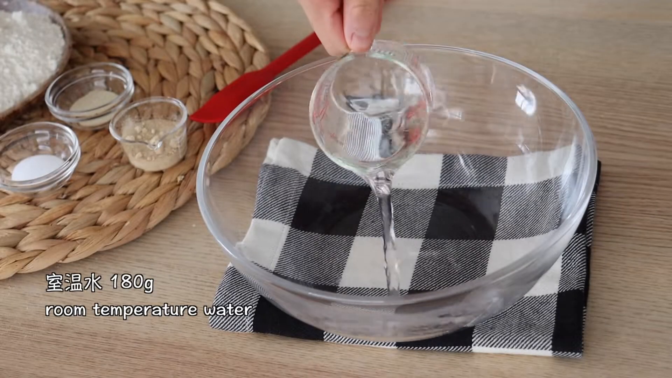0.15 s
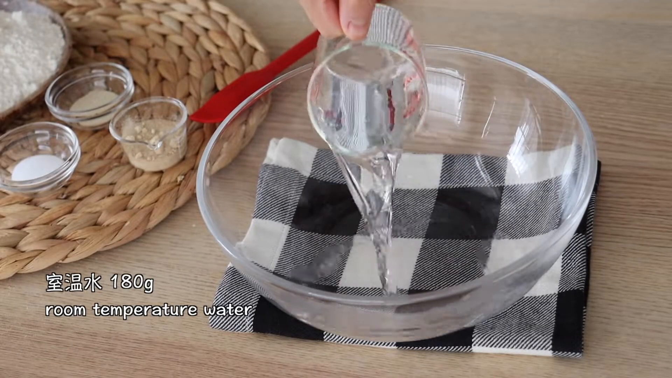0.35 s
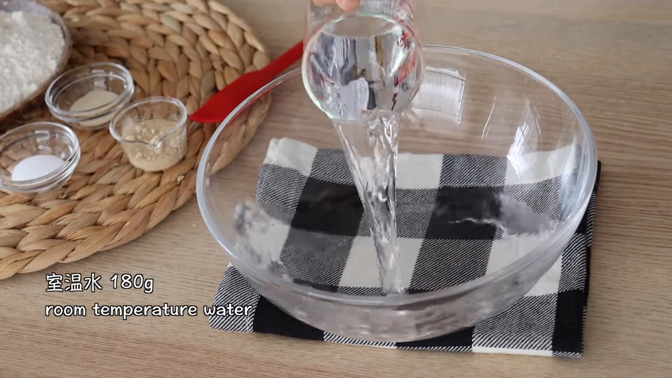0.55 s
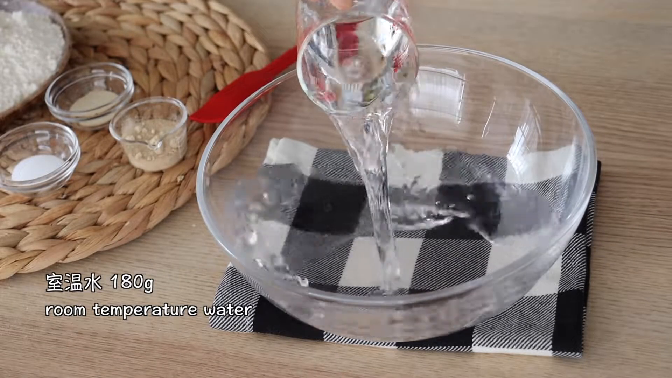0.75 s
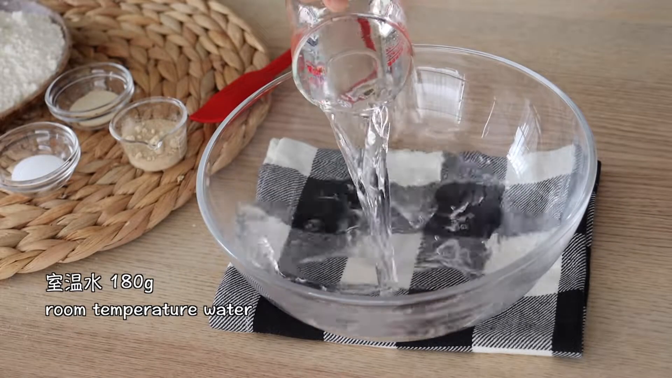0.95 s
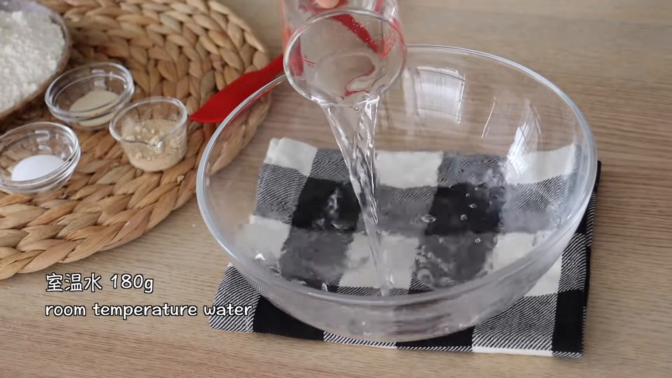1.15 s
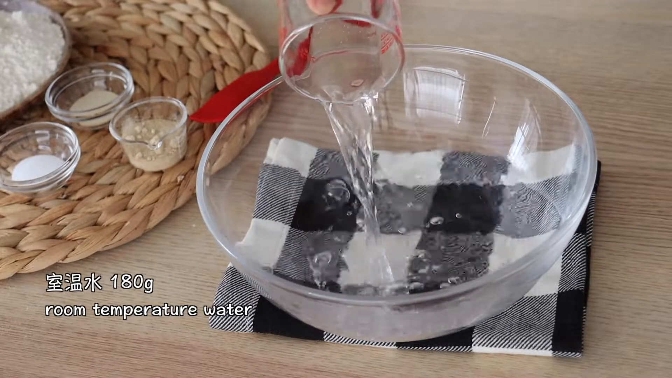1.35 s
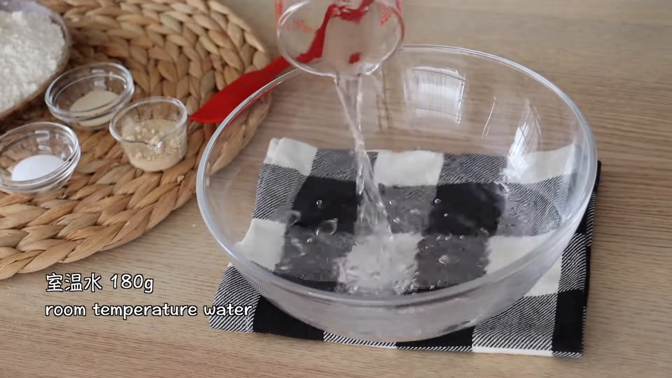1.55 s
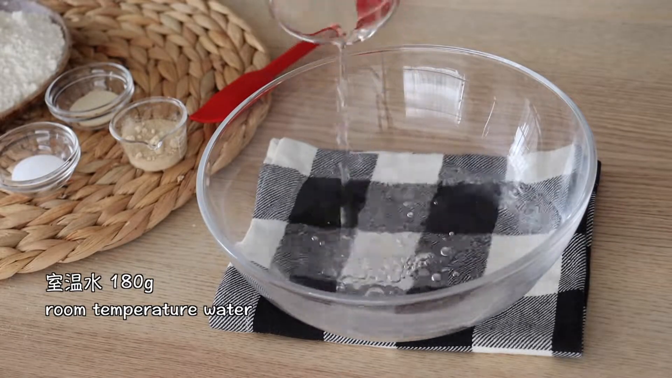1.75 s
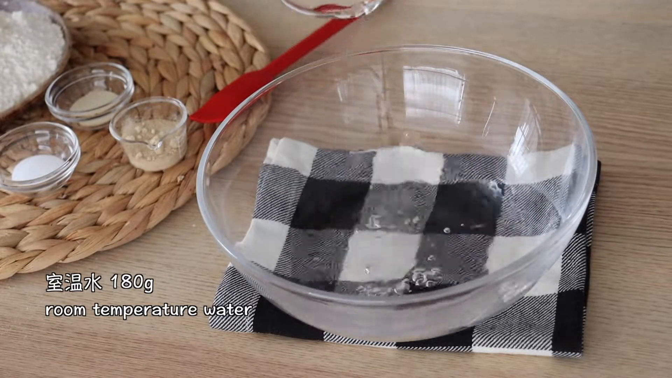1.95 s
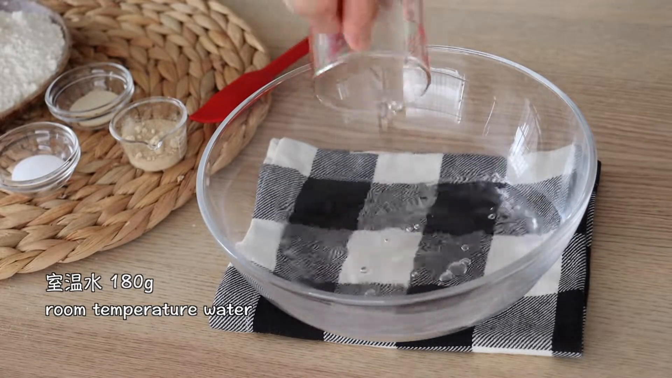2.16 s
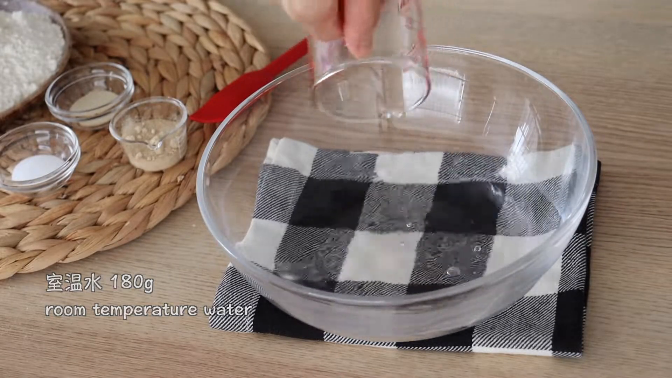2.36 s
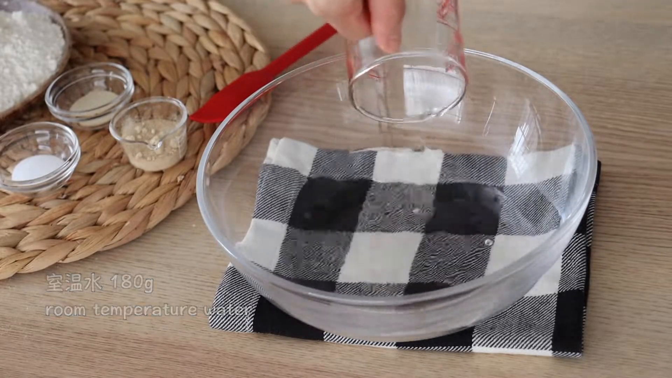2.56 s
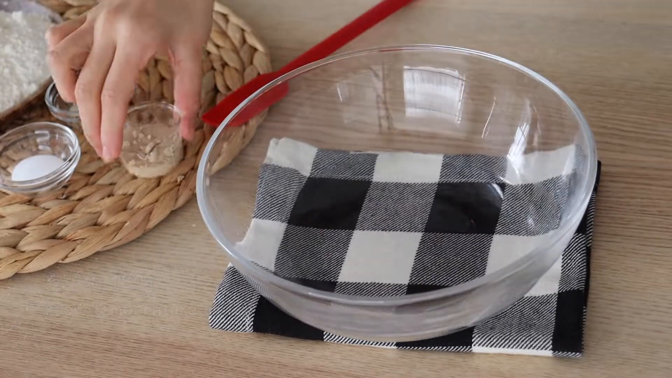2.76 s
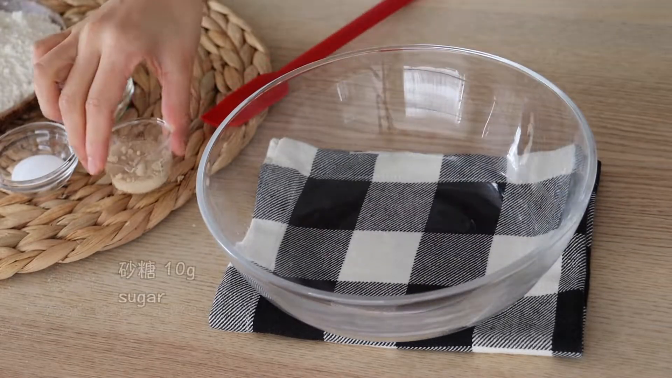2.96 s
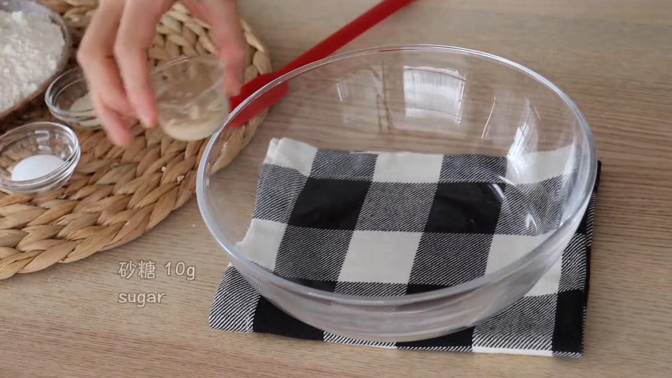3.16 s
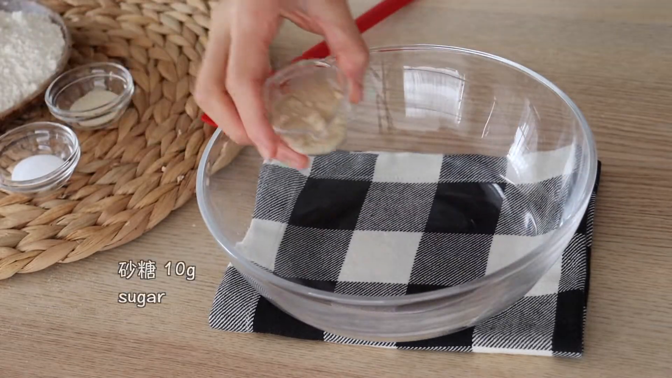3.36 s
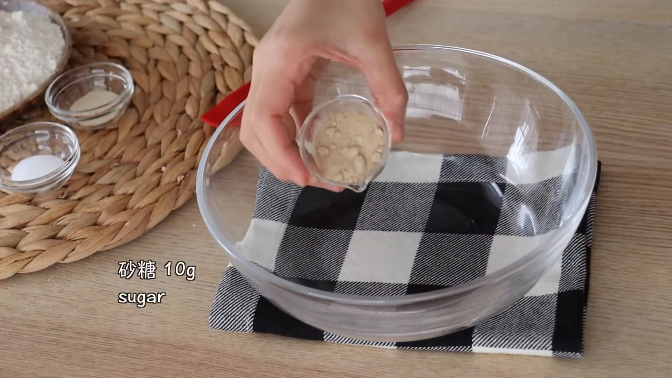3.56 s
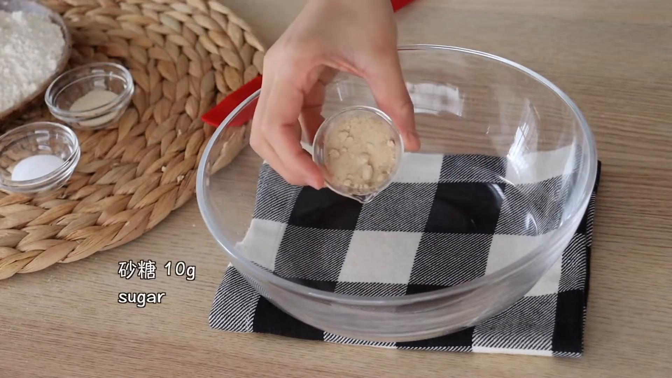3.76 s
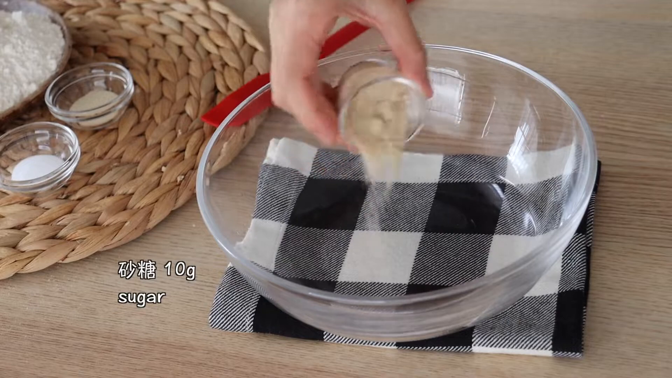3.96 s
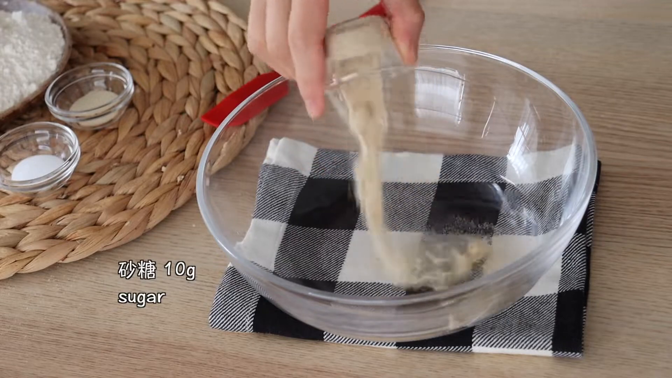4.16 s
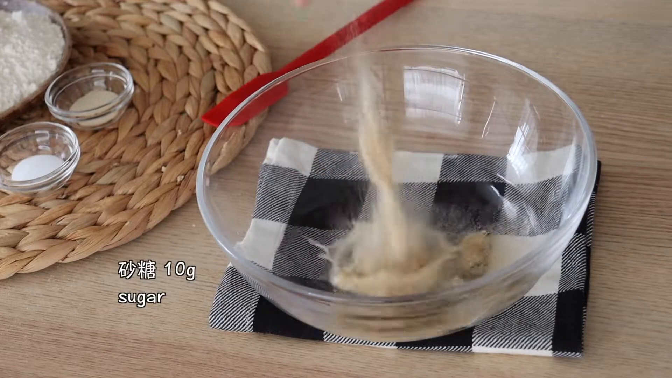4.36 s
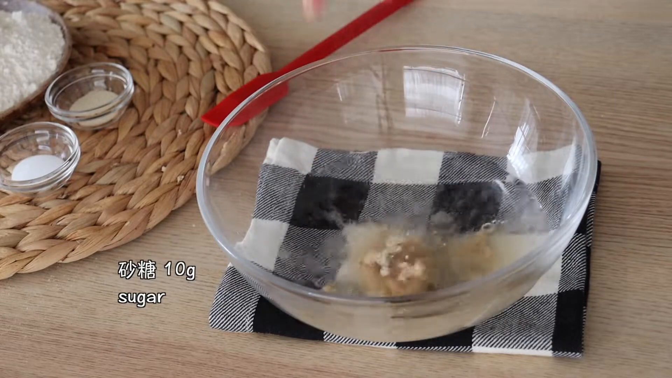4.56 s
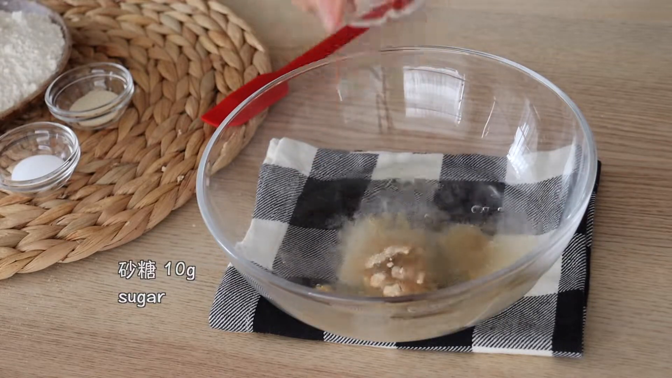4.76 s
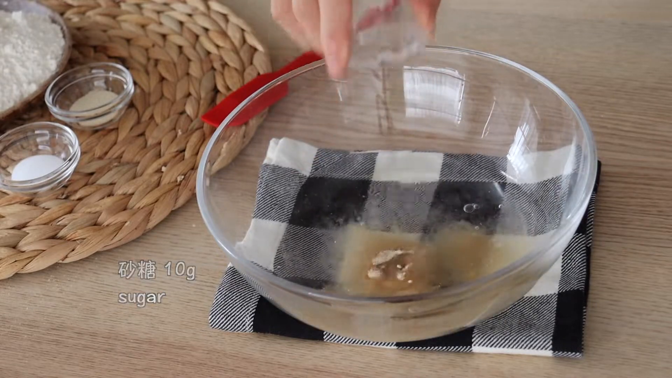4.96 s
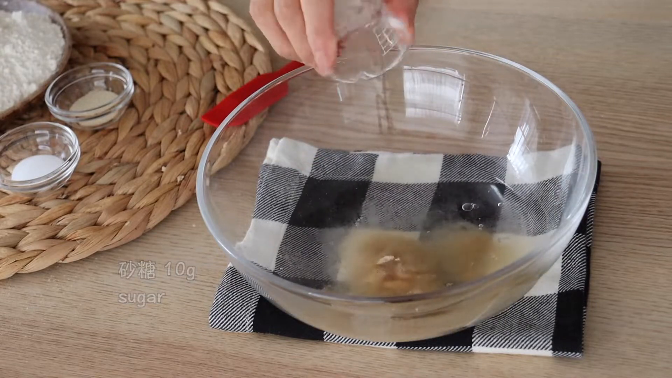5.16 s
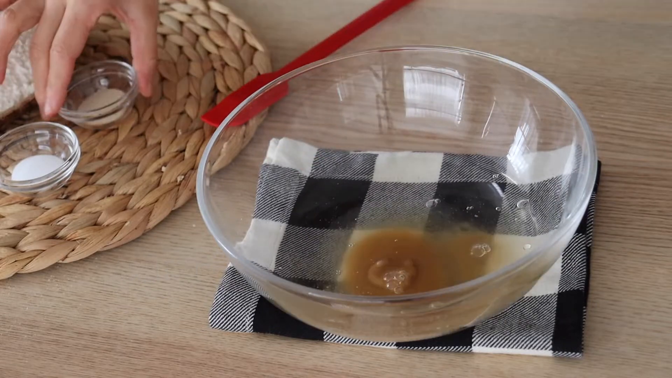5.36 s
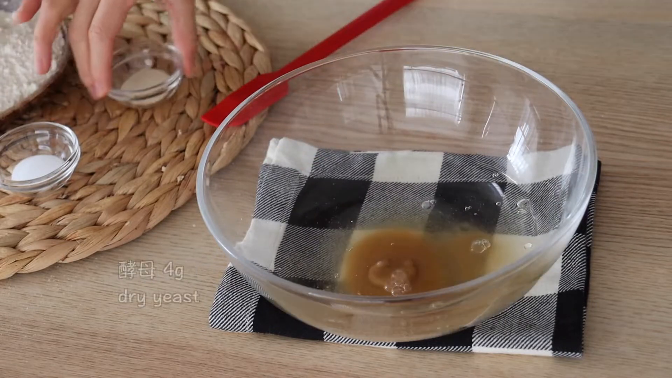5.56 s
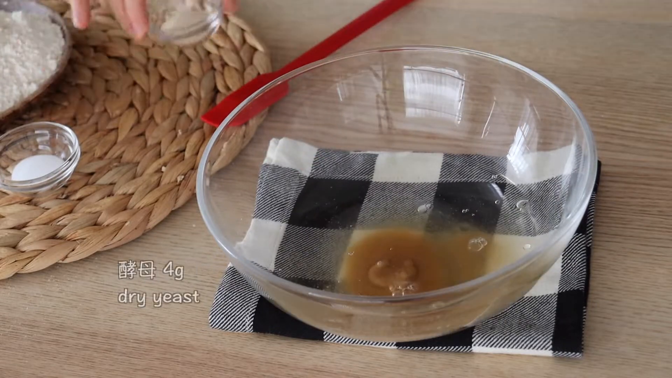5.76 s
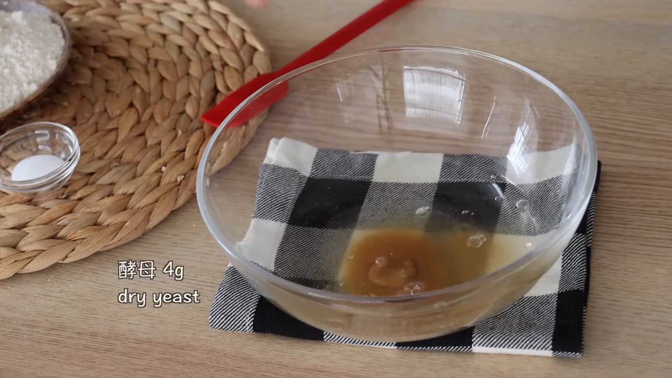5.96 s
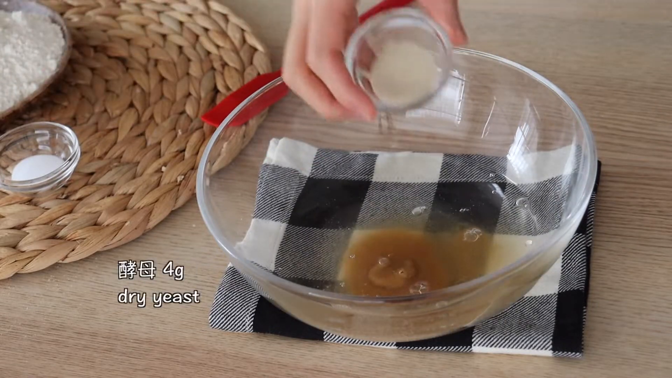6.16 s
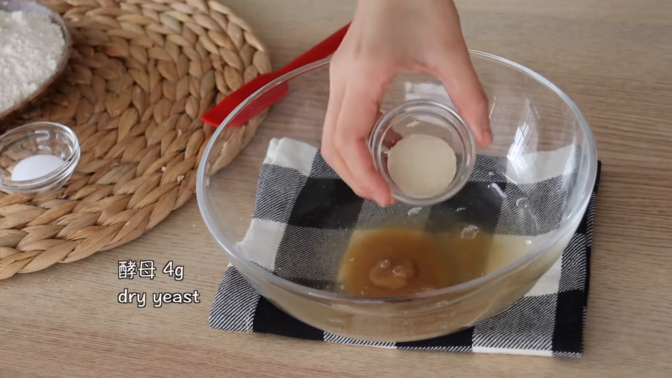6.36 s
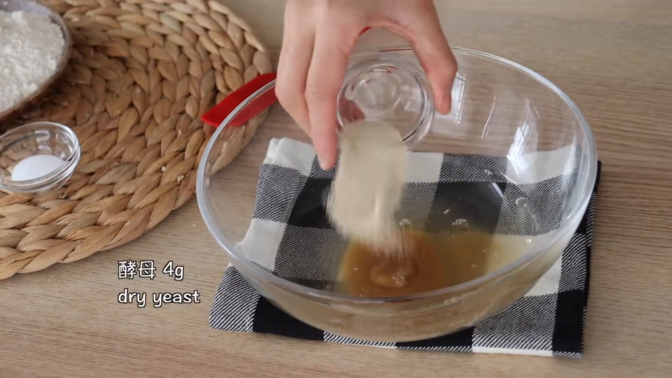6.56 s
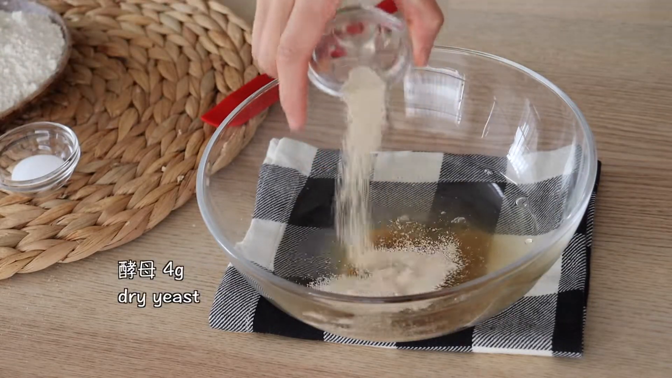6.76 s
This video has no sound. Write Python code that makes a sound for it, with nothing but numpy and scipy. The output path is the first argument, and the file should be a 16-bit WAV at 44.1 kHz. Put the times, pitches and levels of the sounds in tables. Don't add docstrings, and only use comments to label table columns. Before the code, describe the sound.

First drops, a brief gurgling pour into a glass bowl, last bright drips, then faint cup rustles on straw and small plops over low room noise.

```python
import sys
import numpy as np
from scipy import signal
from scipy.fft import rfft, irfft, next_fast_len
from scipy.io import wavfile
from scipy.ndimage import uniform_filter1d

SR = 44100
rng = np.random.default_rng(int(sys.argv[2]) if len(sys.argv) > 2 else 0)


def attenuation_scalar(level_db):
    decades = np.asarray(level_db, float) / 20
    return 10 ** decades


def wav_record(signal):
    frames = np.transpose(np.atleast_2d(signal))
    bounded = np.clip(frames, -1, 1)
    quanta = np.round(bounded * 32767).astype(np.int16)
    wavfile.write(sys.argv[1], SR, quanta)


N = 300321
TIME = np.arange(N) / SR
SIZE = next_fast_len(N + SR // 2)
BINS_HZ = np.maximum(np.arange(SIZE // 2 + 1) * SR / SIZE, 1.0)


def along(points, hz=BINS_HZ):
    point_hz, values = np.transpose(points)
    return np.interp(np.log(hz), np.log(point_hz), values)


def shaped(x, gain):
    return irfft(rfft(x, SIZE) * gain, SIZE)[..., :N]


def resonances(modes):
    response = 0
    for k, (hz, width, db) in enumerate(modes):
        detuning = (BINS_HZ / hz - hz / BINS_HZ) * hz / width
        response = response + (-1) ** k * attenuation_scalar(db) / (1 + 1j * detuning)
    return response


def unit(x):
    return x / np.sqrt(np.mean(x ** 2))


def gain_curve(rows, attack_db_s, release_db_s):
    curve = 0
    for start, hold, db in rows:
        before = np.maximum(start - TIME, 0)
        after = np.maximum(TIME - start - hold, 0)
        curve = curve + attenuation_scalar(db - attack_db_s * before - release_db_s * after)
    return curve


def walk(rate):
    k = int(SR / rate)
    held = np.repeat(rng.standard_normal(N // k + 1), k)
    return unit(uniform_filter1d(uniform_filter1d(held, k), k)[:N])


def grains(rate, scatter_db):
    happens, sign, size = rng.random((3, N))
    return unit((happens < rate / SR) * np.sign(sign - 0.5) * attenuation_scalar(scatter_db * size ** 2))


def add_ring(out, s, size, start_hz, end_hz, life_s, sag=0.59, rise_s=0.0001):
    first = int(s * SR)
    t = np.arange(min(int(3 * life_s * SR) + 8, N - first)) / SR
    age = t / life_s
    hz = start_hz * (end_hz / start_hz) ** np.minimum(age, 1.05)
    phase = 2 * np.pi * np.cumsum(np.minimum(hz, 0.45 * SR)) / SR
    envelope = (1 - np.exp(-t / rise_s)) * np.exp(-sag * age - 0.54 * age ** 4)
    out[first:first + len(t)] += size * envelope * np.sin(phase)


# (time [s], peak level [dB], frequency [Hz], life [ms])
FIRST_DROPS = [(.755, -48, 9300, 3.6), (.78, -46, 10050, 5.2), (.893, -33, 3600, 4), (.935, -40, 10060, 4),
               (0.397, -31.5, 5370, 1.8), (.415, -40, 8150, 2.3), (.416, -47, 7000, 4),
               (0.452, -39, 4630, 2.8), (.452, -48, 9160, 5), (.508, -23.5, 4480, 1.7),
               (.607, -24, 2860, 0.47), (0.611, -27, 2330, 3.7), (.613, -46, 7200, 4.4),
               (.614, -39.5, 7930, 8.5), (.63, -42.5, 9500, 4), (.657, -40.5, 7280, 6.5),
               (0.657, -38, 8300, 2.7), (.706, -30, 2440, 1.8), (.709, -38.5, 4780, 2.8),
               (0.784, -42, 1086, 17), (0.825, -16, 4340, 2.6), (.838, -40, 10050, 3.8),
               (.885, -23, 4500, 0.84), (0.912, -21.5, 3800, 1.2), (0.913, -25.5, 3010, 5.4),
               (.917, -26, 3470, 2.3), (.923, -28.5, 2990, 6), (.93, -30, 2020, 5), (0.939, -33, 3120, 6),
               (.95, -42, 1030, 14)]
# (time [s], peak level [dB], frequency
# [Hz], life [ms])
STREAM_BUBBLES = [(1.003, -26.5, 2480, 6.3), (1.058, -29.5, 4400, 2.7), (1.06, -23, 2400, 2.8),
                  (1.076, -26, 2710, 3.6), (1.127, -30, 3564, 11), (1.146, -28.5, 4040, 3.6),
                  (1.24, -29, 4570, 1.7), (1.277, -19.5, 2340, 3.3), (1.318, -30, 1740, 4),
                  (1.348, -22.5, 2620, 1.5), (1.362, -18, 4200, 1.6), (1.364, -26, 1480, 7.1),
                  (1.404, -27.5, 4200, 8.4), (1.444, -25.5, 1390, 5.6), (1.509, -18, 1500, 5),
                  (1.523, -19.5, 1328, 14), (1.525, -17, 1800, 5), (1.541, -11, 1630, 2.7),
                  (1.572, -14, 1370, 7.4), (1.59, -15.5, 4140, 1.4), (1.594, -14.5, 1070, 1.7),
                  (1.615, -26, 2210, 4.6), (1.615, -14, 1123, 2.8), (1.645, -25, 2240, 1.6),
                  (1.676, -19, 2330, 3.4), (1.642, -21, 4400, 2), (1.651, -17.5, 4500, 1.1),
                  (1.689, -29, 2510, 9.4), (1.711, -19, 4570, 0.78)]
# (time [s], peak level [dB], frequency [Hz], life [ms])
CROWD_BUBBLES = [(1.019, -29, 4500, 1.8), (1.036, -41, 1600, 9.3), (1.069, -32, 2300, 3),
                 (1.086, -30, 2500, 4.6), (1.096, -34, 2670, 5.6), (1.124, -25, 5320, 2),
                 (1.146, -37, 1800, 3), (1.24, -35.5, 1640, 11), (1.254, -35, 5000, 2),
                 (1.264, -33, 4740, 2), (1.297, -32, 5000, 1.5), (1.303, -32, 2170, 6.7),
                 (1.304, -30, 4270, 2.5), (1.317, -29, 2290, 3.6), (1.335, -30.5, 3600, 2.7),
                 (1.339, -33, 1500, 7.1), (1.351, -30, 3740, 3), (1.399, -30, 1560, 3.6),
                 (1.42, -30, 1380, 7), (1.431, -35, 4200, 2.6), (1.459, -33, 4200, 2),
                 (1.463, -32, 1350, 6), (1.479, -28, 2010, 4.2), (1.483, -38, 4200, 4.3),
                 (1.496, -28, 2450, 4.4), (1.516, -18, 1600, 6), (1.517, -32, 900, 2.4),
                 (1.523, -27.5, 2800, 4), (1.537, -28, 4200, 4), (1.564, -21.5, 4730, 1.3),
                 (1.571, -20, 2780, 1.8), (1.58, -26, 4200, 2), (1.599, -17.5, 1240, 3.7),
                 (1.603, -26, 2460, 4.6), (1.611, -21, 2720, 2.3), (1.62, -13, 1190, 4.4),
                 (1.627, -22, 4630, 1.4), (1.629, -19.5, 1100, 3.8), (1.65, -29, 1090, 7.2),
                 (1.668, -28, 4400, 2), (1.665, -28, 1140, 3.5), (1.691, -27, 4270, 4.4),
                 (1.763, -37, 4500, 5.1), (1.916, -30, 1600, 4.9), (1.945, -38, 1600, 4),
                 (1.903, -30, 1595, 6), (1.902, -33, 2400, 5)]
# (time [s], peak level [dB], frequency [Hz], life [ms])
SPECKS = [(0.7723, -43, 10000, 1.2), (0.8236, -41, 12000, 1.2), (0.8378, -39, 10100, 1.2),
          (0.898, -43, 11600, 1.2), (0.9344, -43, 11700, 1.2), (0.9563, -37, 13100, 1.2),
          (0.9948, -46, 11800, 1.2), (1.1255, -50, 10000, 1.2), (1.1255, -42, 11300, 1.2),
          (1.1684, -45, 11500, 1.2), (1.1803, -43, 11800, 1.2), (1.2023, -40, 11500, 1.2),
          (1.2761, -43, 11500, 1.2), (1.2951, -41, 11500, 1.2), (1.3614, -36, 11800, 1.2),
          (1.4811, -33, 15400, 1.2), (1.5206, -38, 12400, 1.2), (1.5689, -45, 10000, 1.2),
          (1.5689, -31, 11400, 1.2), (1.5914, -35, 12000, 1.2), (1.6278, -32, 11700, 0.94),
          (1.6426, -18, 11400, 1.2), (1.6862, -32, 10100, 1.2), (1.75, -31, 11800, 1.1)]
# (time [s], peak level [dB], frequency [Hz], life [ms])
LAST_DRIPS = [(1.751, -26, 4900, 2.2), (1.772, -24.5, 1500, 9.6), (1.773, -21.5, 2140, 4.8),
              (1.777, -20.5, 2440, 7.7), (1.861, -17.5, 4800, 1.3), (1.8613, -10.5, 1570, 5.2),
              (1.8612, -5, 2180, 0.79), (1.773, -20, 4200, 2.5), (1.774, -25, 3220, 1.5),
              (1.875, -23, 1600, 8.6), (1.889, -24, 2465, 6.9), (1.951, -33, 2460, 5.4),
              (1.95, -32.5, 3940, 8.7), (1.951, -19, 6400, 1.1), (1.953, -41, 7000, 24),
              (2.02, -46.5, 2470, 8.5)]
# (time [s], peak level [dB], frequency [Hz], life [ms])
PLOPS = [(3.714, -44, 3200, 3.7), (3.867, -48, 3320, 6.9), (4.101, -39, 2100, 1.3),
         (4.204, -22.5, 1500, 0.91), (4.209, -38, 1370, 4.9), (4.205, -32, 3780, 0.47),
         (4.301, -32.5, 2500, 8.3), (4.301, -30, 4130, 3.1), (4.301, -45, 6800, 3.2),
         (4.369, -32.5, 150, 9.5), (4.37, -40, 2530, 1.9), (4.379, -37, 2460, 6.1), (4.388, -47, 4130, 7.2),
         (4.471, -25.5, 2350, 3.2), (4.477, -27.5, 4000, 2.6), (6.322, -45, 4180, 4), (6.66, -47, 5320, 10),
         (6.74, -47, 2400, 14)]
# (time [s], peak level [dB], start frequency [Hz], life [ms], climb [octaves])
RISERS = [(.71, -22, 1936, 7.1, 0.25), (0.718, -37, 2250, 5, 0.81), (0.843, -17, 1222, 19.7, 0.27),
          (.868, -16, 1636, 6.9, 0.39), (0.997, -32, 4110, 6.6, 0.13), (1.086, -34, 4250, 4.7, 0),
          (1.081, -28.5, 1035, 25.4, 0.81), (1.155, -31, 955, 19, 0.82), (1.181, -31.5, 4600, 3.4, 0.26),
          (1.196, -36, 2400, 4.5, 0.13), (1.542, -19.5, 1555, 8.1, 0.59), (1.632, -22, 1720, 7.5, 0.54),
          (1.715, -26.5, 2214, 13.4, 0.26), (4.369, -38, 1020, 4, 0.54), (4.474, -29, 2820, 6.4, 0.22),
          (6.312, -51, 2950, 12, .47), (6.644, -46, 4330, 8.6, 0.18)]


def bubbles():
    swell = 0.48
    pinch_db = -8.5
    steady = [*FIRST_DROPS, *STREAM_BUBBLES, *CROWD_BUBBLES, *SPECKS, *LAST_DRIPS, *PLOPS]
    out, clicks = np.zeros((2, N))
    for s, db, hz, life_ms, climb in [(*row, 0) for row in steady] + list(RISERS):
        birth_s, life_s = s - 0.0005, life_ms / 1000
        rise_s = 0.000067 + 0.00006 * life_ms + swell * climb ** 3 * life_s
        add_ring(out, birth_s, attenuation_scalar(db + 5.0), hz, hz * 2 ** climb, life_s, rise_s=rise_s)
        clicks[int(birth_s * SR)] += attenuation_scalar(0.64 * db + pinch_db)
    return out + shaped(clicks, resonances([(9000, 5400, 0.5)]))


# (time [s], peak level [dB], ring frequency [Hz], body against snap [dB])
TICKS = [(0.7717, -39, 10500, -11), (0.8254, -35, 5430, -11.5), (0.844, -42, 9600, 2),
         (0.936, -39, 11700, -14), (0.9934, -35, 7200, -12), (1.098, -37, 8800, -12),
         (1.124, -34, 5500, -14), (1.1367, -41, 5600, -14), (1.181, -41, 12000, -9),
         (1.203, -44, 11500, -14), (1.3, -34, 9600, -19), (1.3618, -36, 12500, -7), (1.321, -38, 6600, -14),
         (1.397, -35.5, 7550, -5), (1.5096, -38, 9000, -17), (1.5596, -33, 9600, -14),
         (1.592, -32.5, 6800, 0), (1.615, -32.5, 6400, 2.5), (1.6436, -26, 9700, -11),
         (1.6858, -28.5, 9900, -12), (1.749, -26.5, 9100, -16), (1.7731, -29.5, 8440, 6),
         (1.8115, -31, 6750, -9), (1.8606, -30, 6850, 5), (1.884, -27, 11700, -23), (1.95, -30, 6230, -23),
         (4.2033, -49, 5000, 6), (4.485, -42.5, 9300, -14), (4.2997, -42, 9360, -6),
         (4.3682, -47, 11300, -2)]
# (frequency [Hz], width [Hz], level [dB])
BOWL_MODES = [(1500, 610, 7.5), (2400, 510, 20.5), (4400, 1100, 23), (7000, 3400, 1.5), (9570, 3300, 3),
              (11700, 2800, 1.5), (14800, 680, -0.5)]


def ticks():
    top, body, ring = np.zeros((3, N))
    fade = np.exp(-np.arange(40) / SR / 0.0004)
    for s, db, hz, body_db in TICKS:
        snap = attenuation_scalar(1.263 * db + 24) * rng.standard_normal(40) * fade
        first = int(s * SR)
        top[first:first + 40] += snap
        body[first:first + 40] += attenuation_scalar(body_db) * snap
        add_ring(ring, s, attenuation_scalar(db + 5.5), hz, hz, 0.0018, rise_s=0.00016)
    return shaped(top, resonances(BOWL_MODES[3:]) ** 2) + shaped(body, resonances(BOWL_MODES[:2])) + ring


# (time [s], level [dB])
FLOW = [
    (.8, -48),
    (.88, -20.5),
    (1.13, -13.5),
    (1.22, -16.5),
    (1.28, -11.5),
    (1.57, -5),
    (1.7, -6),
    (1.8, -26),
    (2.02, -25.5),
]


def swarm(sizes, count, cycles, scatter_db, climb):
    out, start, end = np.zeros(N), FLOW[0][0], FLOW[-1][0]
    for when, pick, detune, loud, life in rng.random((count, 5)):
        hz, spread, db = sizes[int(pick * len(sizes))]
        hz = hz + spread * (2 * detune - 1)
        s, size = start + when * (end - start), attenuation_scalar(db + scatter_db * loud ** 2)
        add_ring(out, s, size, hz, hz * (1 + climb * life), cycles * (0.24 + life) / hz, rise_s=0.00013)
    return out / np.std(out[int(start * SR):int(end * SR)])


# (frequency [Hz], spread [Hz], level [dB])
GURGLE = [(1500, 300, 0.5), (2010, 380, -6), (2400, 380, 2)]
# (frequency [Hz], spread [Hz], level [dB])
CHIRP = [(3310, 530, -3.5), (4250, 420, -7), (5430, 950, -7.5)]
# (frequency [Hz], spread [Hz], level [dB])
FIZZ = [(7000, 950, 5.5), (9000, 830, 4), (12500, 1800, -16)]


def churn():
    flow_db = np.interp(TIME, *np.transpose(FLOW), left=-400, right=-400)
    gurgle = swarm(GURGLE, count=1200, cycles=9.6, scatter_db=8.0, climb=0.16)
    chirp = swarm(CHIRP, count=900, cycles=12.5, scatter_db=19.0, climb=0.12)
    fizz = swarm(FIZZ, count=350, cycles=11.0, scatter_db=4.0, climb=0.048)
    spray = unit(shaped(grains(3000.0, 6.9), resonances([(5500, 4300, 2), (12500, 13000, 1)])))
    splash = unit(shaped(grains(900.0, 11.0), resonances(BOWL_MODES)))
    out = gurgle * attenuation_scalar(-25 + 1.28 * flow_db)
    out += chirp * attenuation_scalar(-36 + 0.66 * flow_db)
    out += (attenuation_scalar(-47) * fizz + attenuation_scalar(-48) * spray) * attenuation_scalar(0.57 * flow_db)
    return out + splash * attenuation_scalar(-43 + 0.87 * flow_db)


# (start [s], hold [s], level [dB])
SCRAPES = [(2.775, 0.11, -49.5), (2.818, 0.0063, -44.5), (2.89, 0.027, -57), (2.9, 0.011, -45.5),
           (3.712, .008, -58), (3.865, 0.0098, -60), (4.37, 0.029, -51.5), (5.36, 0.092, -53),
           (5.452, 0.013, -49.5), (5.47, 0.064, -46), (5.522, 0.018, -42), (5.55, 0.035, -36.5),
           (5.605, 0.037, -43), (5.62, 0.0073, -40)]
# (frequency [Hz], width [Hz], level [dB])
STRAW_MODES = [(890, 870, -11), (1600, 2900, 9.5), (2330, 500, -5), (3020, 2500, 8), (4200, 570, 1),
               (5000, 2200, 4.5), (7000, 9800, -1.5), (9080, 1300, 2.5), (12000, 14000, 4)]
# (start [s], hold [s], level [dB])
PATTER = [
    (6.643, 0.0056, -41),
    (6.66, .04, -67),
]
# (start [s], hold [s], level [dB])
BRUSHES = [
    (2.9, 0.014, -46.5),
    (5.385, 0.043, -45.5),
    (5.55, 0.023, -62),
]


def scrapes():
    crackle = 0
    for hz, width, db in STRAW_MODES:
        fibre = unit(shaped(grains(2500.0, 4.6), resonances([(hz, width, 0)]) ** 2))
        crackle = crackle + attenuation_scalar(db + 2.6 * walk(70.0)) * fibre
    patter = unit(shaped(grains(5000.0, 9.4), resonances([(4500, 2400, -1.3), (9900, 3100, -1.2)])))
    patter_gain = gain_curve(PATTER, 3000.0, 360.0) + gain_curve(BRUSHES, 600.0, 500.0)
    return attenuation_scalar(4.5) * unit(crackle) * gain_curve(SCRAPES, 1360.0, 990.0) + patter * patter_gain


# (frequency [Hz], width [Hz], level [dB])
BOARD_MODES = [(143, 17, -8), (221, 27, 4.5), (338, 20, 7), (408, 102, 0), (576, 104, 1), (666, 800, -12)]
# (frequency [Hz], width [Hz], level [dB])
LEG_MODES = [(21.4, 9.4, -2.5), (54.4, 15, -10), (68.4, 7.7, -0.5)]
# (frequency [Hz], width [Hz], level [dB])
RAIL_MODES = [(98, 16, -1), (142.9, 9.9, 0)]
# (start [s], hold [s],
# level [dB])
KNOCKS = [
    (1.51, .13, -57),
    (2.772, .003, -63.5),
    (2.783, 0.16, -59.5),
    (4.29, .004, -53),
    (4.369, 0.0045, -59),
    (4.69, 0.0085, -54),
    (5.51, 0.14, -50),
    (5.545, 0.07, -42),
]
# (start [s], hold [s], level [dB])
TOUCHES = [
    (3.708, 0.011, -50),
    (3.858, 0.046, -50.5),
    (3.93, 0.08, -64),
]
# (start [s], hold [s], level [dB])
LEG_PUSHES = [
    (1.6, 0.19, -50),
    (2.8, 0.17, -47.5),
    (3.3, 0.87, -59),
    (4.34, 0.053, -43),
    (4.55, 0.082, -42),
    (5.1, .02, -57),
    (5.4, 0.19, -58),
    (5.76, 0.14, -44.5),
]
# (start [s], hold [s], level [dB])
RAIL_PUSHES = [
    (1.5, 0.27, -51),
    (2.79, 0.057, -56),
    (4.31, .03, -48.5),
    (4.37, 0.034, -42),
    (4.95, 0.08, -49.5),
    (5.62, 0.03, -45),
    (5.9, .7, -62),
]


def table():
    jolts = grains(1500.0, 10.0)
    board = unit(shaped(jolts, resonances(BOARD_MODES)))
    touch = unit(shaped(jolts, resonances(BOARD_MODES[2:])))
    legs = unit(shaped(rng.standard_normal(N), resonances(LEG_MODES) ** 2))
    rails = unit(shaped(rng.standard_normal(N), resonances(RAIL_MODES) ** 2))
    out = attenuation_scalar(10.0) * board * gain_curve(KNOCKS, 540.0, 356.0)
    out += attenuation_scalar(10.0) * touch * gain_curve(TOUCHES, 1100.0, 360.0)
    out += attenuation_scalar(3.5) * legs * gain_curve(LEG_PUSHES, 200.0, 35.0)
    return out + attenuation_scalar(5.0) * rails * gain_curve(RAIL_PUSHES, 270.0, 117.0)


# (time [s], peak level [dB], frequency [Hz], life [ms])
SWAYS = [(4.325, -30, 68, 30), (4.368, -27.5, 72, 64), (4.44, -37, 66, 30), (4.54, -33, 68, 79),
         (4.62, -33, 68, 50), (5.8, -34, 68, 65), (3.862, -38, 400, 10), (3.884, -37, 330, 11),
         (3.904, -35, 420, 11), (5.531, -20, 358, 5.8), (5.567, -24.5, 454, 8), (5.603, -22, 242, 9.7),
         (5.624, -23, 300, 5.1), (5.634, -27, 180, 12), (5.655, -25, 260, 6)]


def sways():
    out = np.zeros(N)
    for s, db, hz, life_ms in SWAYS:
        add_ring(out, s, attenuation_scalar(db), hz, hz, life_ms / 1000, rise_s=0.14 / hz)
    return out


# (frequency [Hz], T60 [s])
ROOM_T60 = [(300, 0.19), (2000, 0.23), (6000, 0.18), (14000, 0.17)]
# (frequency [Hz], level [dB])
ROOM_COLOUR = [(1500, -5), (2500, -1.5), (4200, -3), (8000, 1), (13000, -4)]


def room():
    t = np.arange(SR // 2) / SR
    tails, centres = 0, 350 * 2.0 ** np.arange(6)
    for hz, t60 in zip(centres, along(ROOM_T60, centres)):
        band = signal.butter(2, [hz / np.sqrt(2), hz * np.sqrt(2)], "band", fs=SR, output="sos")
        strength = attenuation_scalar(3.5 * rng.standard_normal((2, len(t) // 90 + 1))).repeat(90, axis=1)[:, :len(t)]
        echoes = rng.standard_normal((2, len(t))) * strength
        tails = tails + signal.sosfilt(band, echoes) * attenuation_scalar(-60 * t / t60) * np.sqrt(1 / t60)
    tails = tails * (1 - np.exp(-(t / 0.001) ** 2))
    tails = tails / np.sqrt(np.sum(tails ** 2, axis=1, keepdims=True))
    return rfft(tails, SIZE) * attenuation_scalar(-4 + along(ROOM_COLOUR))


# (frequency [Hz], level [dB per Hz])
AIR = [(12, -14), (20, -1.5), (116, -6), (214, -4.5), (320, -7.5), (800, -13.5), (2050, -20),
       (15700, -28.5)]
# (frequency [Hz], left minus right [dB])
AIR_BALANCE = [(60, 11), (110, 7), (200, 11), (380, 9), (700, 7.5), (1290, 4.5), (4400, 1.5), (15000, 0)]
# (frequency [Hz], correlation [-1 to 1])
AIR_LIKENESS = [(60, -0.56), (130, -0.33), (290, 0.06), (640, 0.13), (1410, 0.42), (3100, 0.39),
                (6820, 0.55), (15000, 0.63)]


def air():
    like = np.clip(along(AIR_LIKENESS), -1, 1)
    a, b = rfft(rng.standard_normal((2, SIZE)))
    pair = np.array([a, like * a + np.sqrt(1 - like ** 2) * b])
    lean = attenuation_scalar(along(AIR_BALANCE))
    left = attenuation_scalar(along(AIR)) / np.sqrt(1 + 1 / lean ** 2 + 2 * like / lean)
    noise = irfft(pair * [left, left / lean], SIZE)[:, :N]
    level_db = -51.5 + 3 * (TIME > 2.772) + 0.046 * walk(1.6)
    return noise / np.std(noise.mean(axis=0)) * attenuation_scalar(level_db)


# (frequency [Hz], level against left [dB])
RIGHT_DIRECT = [(60, -8), (300, -23), (1300, -41.5), (4400, -39), (8000, -50), (15000, -35)]
# (frequency [Hz], level against left [dB])
RIGHT_ROOM = [(60, 6), (1300, -11), (4400, -9.5), (8000, -1), (15000, -6)]


def scene():
    left_tail, right_tail = room()
    right_direct = attenuation_scalar(along(RIGHT_DIRECT)) * np.exp(-1j * 5.6)
    paths = np.array([1 + left_tail, right_direct + attenuation_scalar(along(RIGHT_ROOM)) * right_tail])
    near = ticks() + churn() + scrapes()
    near = near + bubbles() * attenuation_scalar(2.0 * walk(500.0))
    right_shake = attenuation_scalar(-17.0) * np.exp(-1j * 1.8) + attenuation_scalar(-11.5) * right_tail
    shake = np.array([np.ones_like(BINS_HZ), right_shake])
    return shaped(near, paths) + shaped(table() + sways(), shake) + air()


def top_cut(x):
    return signal.sosfilt(signal.butter(12, 16990, fs=SR, output="sos"), x)


def record(dry):
    low_pass = signal.ellip(10, 0.2, 80, 15950, fs=SR, output="sos")
    mix = signal.sosfilt(low_pass, np.clip(dry, -1, 1))
    return top_cut(mix)


dry = scene()
out = record(dry)
wav_record(out)
```